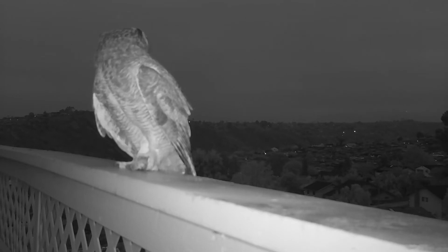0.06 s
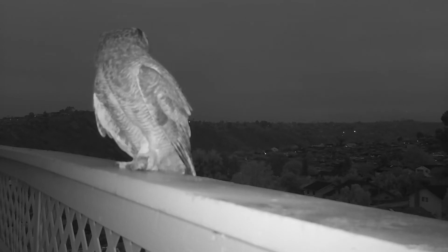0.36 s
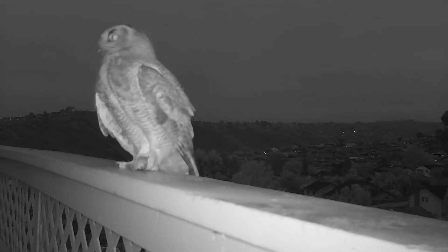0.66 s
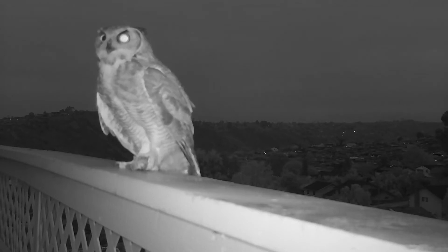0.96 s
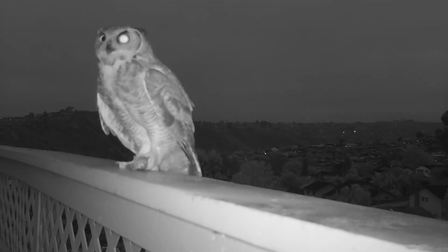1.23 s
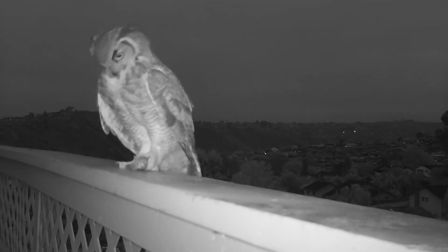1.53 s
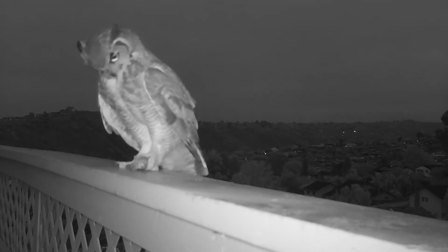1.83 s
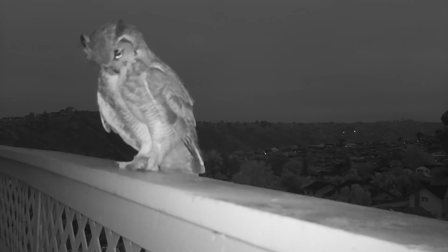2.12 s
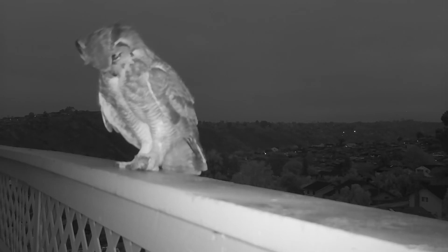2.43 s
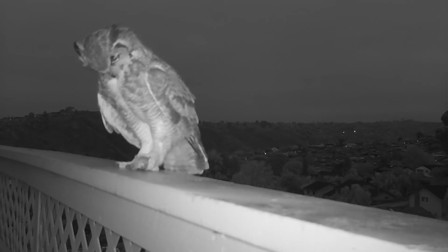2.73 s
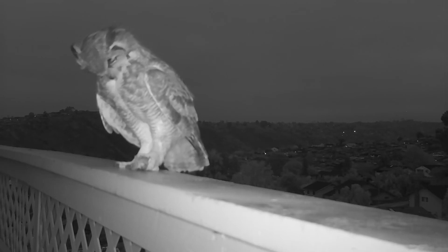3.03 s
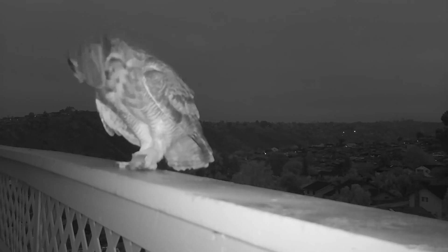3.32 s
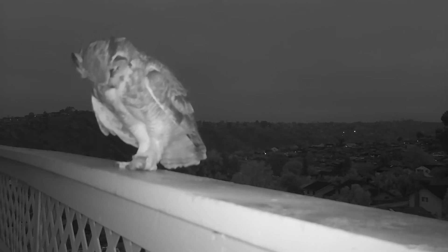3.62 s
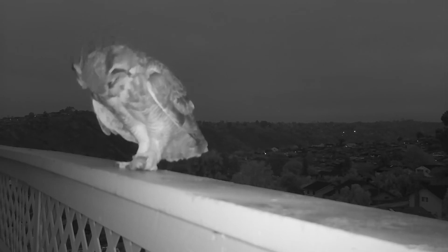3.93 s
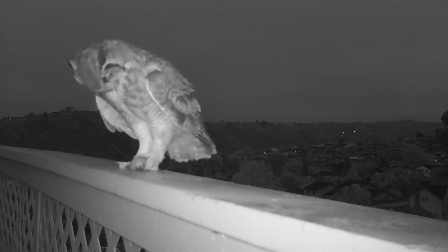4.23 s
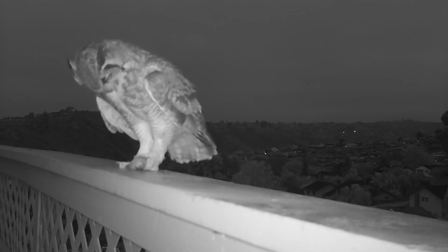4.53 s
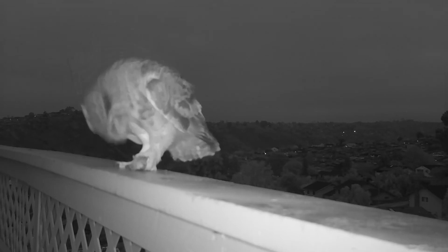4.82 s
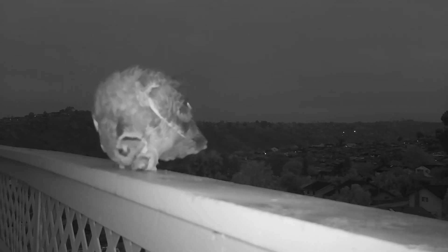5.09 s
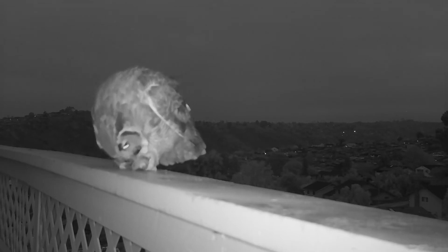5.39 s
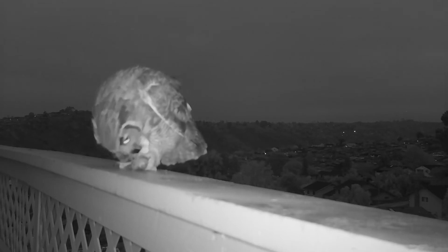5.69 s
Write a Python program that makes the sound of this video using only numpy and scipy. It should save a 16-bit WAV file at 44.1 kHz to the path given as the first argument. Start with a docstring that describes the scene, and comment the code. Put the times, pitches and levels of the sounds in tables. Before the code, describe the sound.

Outdoors at night, a quiet town rumble, faint hum, shrill far insects and microphone hiss carry on throughout, dotted with distant bird chirps and thin ticks. Close by and dry, a large owl picks at its prey: sparse soft clicks at first, then a hard crack of the beak and a busier run of snaps and short tearing pulls. A faint, distant motor tone enters near the end.

```python
"""An owl tears at its prey on a wooden deck rail at night, close to a small outdoor camera.
Each beak snap is one ringing contact; pulls and nibbles are runs of tiny slips of the same kind.
Far birds chirp, whistle and squeak (gliding sines), scold and trill (noise bursts); thin ticks fall.
The hillside echoes them. Under all: town rumble, faint hum, a far insect chorus and camera hiss.
A distant motor comes in near the end."""
import sys
import numpy as np
from scipy import signal
from scipy.fft import rfft, irfft, next_fast_len
from scipy.io import wavfile
from scipy.ndimage import map_coordinates

SR = 44100
rng = np.random.default_rng(int(sys.argv[2]) if len(sys.argv) > 2 else 0)


def dump_mix(stems):
    """Bounce the given channels to the path in sys.argv[1] as a 16-bit WAV at rate SR."""
    frames = np.atleast_2d(stems).T  # one column per channel
    limited = np.clip(frames, -1, 1)  # hard clip at full scale
    pcm = np.round(limited * 32767).astype(np.int16)
    wavfile.write(sys.argv[1], SR, pcm)


N = 262395
TIME_S = np.arange(N) / SR

# town rumble: (frequency [Hz], relative density [dB])
TOWN_SPECTRUM = [(10, -35), (27, -0.5), (90, 0.5), (200, -4.5), (400, -9.5), (650, -9), (900, -7),
                 (1150, -8.5), (1500, -15.5), (2200, -23), (5000, -70.5)]
# hum: (frequency [Hz], level [dB])
HUM_TONES = [(85, -68), (113, -66.5), (356, -70.5)]
# shrill insect band: (frequency [Hz], relative density [dB])
INSECT_SPECTRUM = [(3000, -52), (3800, -6.5), (4200, 3.5), (4480, -2.5), (4800, -34), (6000, -53.5)]
# chorus swell: (time [s], level before lift [dB])
INSECT_SWELL = [(0.0, -59), (0.61, -57), (0.86, -61.5), (1.67, -59.5), (2.17, -56), (2.48, -61.5),
                (3.48, -60.5), (5.15, -58), (5.42, -60), (5.95, -58.5)]
# camera hiss: (frequency [Hz], relative density [dB])
HISS_SPECTRUM = [(700, -12.5), (1700, -9), (2200, -3), (2650, -1), (3250, -10), (3750, -7), (4230, -6.5),
                 (4700, -8), (6000, -14), (7500, -16), (8800, -15), (11000, -19), (15700, -22.5)]
# ticks, about three a second with pauses: (time [s])
TICK_TIMES_S = [.056, .467, .870, 1.335, 1.635, 1.959, 2.307, 2.647, 2.979, 3.357, 3.656, 3.958, 4.442,
                4.797, 5.526]
# one bird, about every 2 s: (time [s], level [dB], final pitch [Hz])
CHIRP_NOTES = [(0.071, -40.5, 5088), (2.218, -48, 5088), (3.97, -44.5, 5132), (5.71, -46.5, 5013)]
# held whistles: (time [s], level [dB])
WHISTLE_NOTES = [(.28, -59), (3.14, -59)]
# one beak contact: (frequency [Hz], gain [dB])
CONTACT_SPECTRUM = [(200, -30), (900, -17.5), (1450, -12.5), (2150, -3), (2620, 8), (3050, -1.5),
                    (3600, -9), (4300, -15.5), (5300, -20), (6050, -39), (6900, -33.5), (8000, -52.5),
                    (9000, -47.5), (11000, -78.5), (14500, -109)]
# harder contact, broader spectrum: (frequency [Hz], gain per hardness [dB/dB])
HARDNESS_SLOPE = [(1100, 0.65), (2000, 0.1016), (2650, 0), (3500, 1), (5000, 1.1849), (7000, 1.83)]
# ring after a contact: (frequency [Hz], gain over contact [dB], t60 [s])
RING_MODES = [(1175, -5.5, 0.02), (1651, 1.5, 0.0435), (2087.5, 6, 0.0262), (2640, -5.5, 0.0313),
              (2924, -3.5, 0.0197), (3322, -1.5, 0.0122), (3713.3, 7, 0.014), (4278.6, 12, 0.0186),
              (4946, 2, 0.019)]
# quick bites: (time [s], rms [dB])
BEAK_NIBBLES = [(.452, -48.5), (1.765, -48.5), (2.308, -50.5), (2.328, -44), (4.018, -41), (4.061, -47.5),
                (4.145, -50), (4.173, -49.5), (4.203, -43.5), (4.946, -48.5), (4.971, -38.5)]
# squeaks: (time [s], length [s], first pitch [Hz], final pitch [Hz], level [dB], bend, upper voice [Hz])
SQUEAK_NOTES = [(.485, 0.02564, 4687, 4112, -44.5, 2.47, 6650), (5.091, .048, 5306, 2975, -40, .33, 6355)]
# scolding: (time [s], level [dB])
SCOLD_NOTES = [(.655, -50.5), (.857, -55.5), (0.997, -56), (1.107, -54), (1.24, -60), (5.127, -48.5)]
# hoarse colour: (frequency [Hz], relative density [dB])
SCOLD_SPECTRUM = [(2000, -11), (3600, 2.5), (5000, 0), (7000, -5.5), (9000, -10), (12500, -24.5),
                  (15000, -39.5)]
# sharp snaps: (time [s], peak before cap [dB], hardness [dB])
BEAK_SNAPS = [(1.212, -41.5, 2), (1.7975, -34.5, -8), (3.3823, 0, 14.5), (3.3841, -19, 0.5),
              (3.8738, -23, 1.5), (4.0971, -19, -6.5), (4.1031, -21.5, 3), (4.111, -23.5, -8.5),
              (4.7215, -24, -2.5), (4.9093, -14.5, -4), (5.0232, -27, -1), (5.0689, -31.5, -0.5),
              (5.857, -33.5, 6)]
# pulls: (time [s], length [s], rms [dB], hardness [dB], flesh gives at [share of length])
BEAK_PULLS = [(1.6, 0.106, -56, -7, 0.51), (3.236, 0.0308, -43.5, -5.5, 0.82),
              (3.271, 0.0178, -46, -2.5, .6), (3.413, 0.0244, -49, 4, 0.72), (4.087, .03, -33.5, -4, 0.138),
              (4.632, 0.0334, -44.5, 1.5, 0.39), (4.664, 0.0908, -42, 0.5, 0.48),
              (4.84, 0.0276, -46, -0.5, 0.52), (5.021, 0.057, -44, -0.5, 0.091),
              (5.702, .086, -50, -1, 0.35), (5.802, 0.018, -49.5, -5.5, 0.34),
              (5.856, 0.0178, -47.5, 3, 0.19)]


def amp(db):
    return 10 ** (np.asarray(db) / 20)


def unit_rms(x):
    return x / np.sqrt(np.mean(x ** 2) + 1e-20)


def along(points, hz):
    """Interpolate (frequency [Hz], value) points on a log axis."""
    knots_hz, values = np.transpose(points)
    return np.interp(np.log(hz + 1), np.log(knots_hz + 1), values)


def wobble(rate_hz):
    """Smooth random curve, rate_hz knots a second."""
    return map_coordinates(rng.standard_normal(int(N * rate_hz / SR) + 4), [TIME_S * rate_hz])


def filtered(x, response):
    """Apply a gain that depends on frequency."""
    size = next_fast_len(len(x) + 8192)
    return irfft(rfft(x, size) * response(np.fft.rfftfreq(size, 1 / SR)), size)[:len(x)]


def noise(spectrum):
    """Coloured noise, rms 1."""
    return unit_rms(filtered(rng.standard_normal(N), lambda hz: amp(along(spectrum, hz))))


def tone(hz, wander_rad):
    """Sine with wandering phase, rms 1."""
    return np.sqrt(2) * np.sin(2 * np.pi * hz * TIME_S + wander_rad * wobble(4.968))


def town(level_db=-49.5, lull_db=-1.97, lull_span_s=(4.43, 5.38), flutter_db=0.9929):
    """The town below: a rumble that eases near the end, and a faint hum."""
    easing_db = np.interp(TIME_S, lull_span_s, [0, lull_db])
    rumble = amp(level_db + easing_db + flutter_db * wobble(7.052)) * noise(TOWN_SPECTRUM)
    hum = sum(amp(db) * tone(hz, wander_rad=0.835) for hz, db in HUM_TONES)
    return rumble + hum


def insects(lift_db=1.0, pulse_db=1.5):
    """Far, shrill chorus: a noise band that swells slowly and pulses."""
    swell_db = np.interp(TIME_S, *np.transpose(INSECT_SWELL))
    return amp(swell_db + lift_db + pulse_db * wobble(14)) * noise(INSECT_SPECTRUM)


def camera_hiss(level_db=-55.0):
    """The camera's own steady noise."""
    return amp(level_db) * noise(HISS_SPECTRUM)


def ticks(level_db=-54.0, first_hz=9600, final_hz=3400, length_s=0.011, echo_s=0.0046, echo_db=-6):
    """Fast downward sweeps, all alike, each doubled by a nearby surface."""
    out = np.zeros(N)
    progress = np.linspace(0, 1, round(length_s * SR))
    hz = first_hz * (final_hz / first_hz) ** progress
    sweep = np.sqrt(2) * np.sin(np.pi * progress) * np.sin(2 * np.pi * np.cumsum(hz) / SR)
    for time_s in TICK_TIMES_S:
        add(out, time_s, amp(level_db) * sweep)
        add(out, time_s + echo_s, amp(level_db + echo_db) * sweep)
    return out


def add(track, time_s, sound):
    """Mix a sound into a track."""
    part = track[max(round(time_s * SR), 0):][:len(sound)]
    part += sound[:len(part)]


def note(length_s, first_hz, final_hz, bend, warble_depth_hz, waver=0.0088, warble_hz=135, late=1):
    """Whistled note: swells, warbles, falls. bend > 1 drops early; late > 1 delays the swell."""
    progress = np.linspace(0, 1, round(length_s * SR))
    glide_hz = final_hz + (first_hz - final_hz) * (1 - progress) ** bend
    hz = glide_hz * (1 + waver * wobble(386.6)[:len(progress)])
    hz += warble_depth_hz * np.sin(2 * np.pi * warble_hz * length_s * progress)
    swell = np.sin(np.pi * progress ** late)
    return np.sqrt(2) * swell * np.sin(2 * np.pi * np.cumsum(hz) / SR)


def chirps(length_s=0.0365, fall_ratio=1.145):
    """A far bird repeats one short falling note."""
    out = np.zeros(N)
    for time_s, db, final_hz in CHIRP_NOTES:
        chirp = note(length_s, fall_ratio * final_hz, final_hz, bend=3.57, warble_depth_hz=60)
        add(out, time_s, amp(db) * chirp)
    return out


def whistles(length_s=0.169, first_hz=3820, final_hz=3750, high_tone_ratio=2.07, high_tone_db=-15):
    """A held, wavering whistle; a faint, thin tone near 8 kHz sounds with it."""
    out = np.zeros(N)
    for time_s, db in WHISTLE_NOTES:
        for ratio, tone_db in [(1, 0), (high_tone_ratio, high_tone_db)]:
            held = note(length_s, ratio * first_hz, ratio * final_hz,
                        bend=0.99, warble_depth_hz=70, waver=0.0143)
            add(out, time_s, amp(db + tone_db) * held)
    return out


def contact(hardness_db, size=2048):
    """One contact: a short pulse and its brief ring. Harder is brighter."""
    hz, time_s = np.fft.rfftfreq(size, 1 / SR), TIME_S[:size]
    gain_db = along(CONTACT_SPECTRUM, hz) + hardness_db * along(HARDNESS_SLOPE, hz)
    cepstrum = irfft(np.log(amp(gain_db)))
    cepstrum[1:size // 2] *= 2  # fold to minimum phase: a causal pulse
    cepstrum[size // 2 + 1:] = 0
    ring = np.zeros(size)
    for mode_hz, db, t60_s in RING_MODES:
        fade = 1000 ** (-time_s / t60_s)
        ring += 2 * amp(db) * fade / fade.sum() * np.cos(2 * np.pi * mode_hz * time_s)
    return irfft(np.exp(rfft(cepstrum)) * (1 + rfft(ring)))


def tear(length_s, hardness_db, gives_at, slips_per_s=2800, spread_db=4.5, swell_db=8):
    """Tiny slips, each a contact, grow until the flesh gives, then ease; rms 1 over length_s."""
    count = round(length_s * SR)
    tension = np.interp(np.linspace(0, 1, count), [0, gives_at, 1], [0, 1, 0])
    slips = (rng.random(count) < slips_per_s / SR) * rng.choice([-1, 1], count)
    strength = amp(spread_db * rng.standard_normal(count) + swell_db * tension)
    sound = signal.fftconvolve(slips * strength, contact(hardness_db))
    return sound * np.sqrt(count / (np.sum(sound ** 2) + 1e-12))


def nibbles(length_s=0.0077, hardness_db=-3.5):
    """Quick bites, each a very short tear."""
    out = np.zeros(N)
    for time_s, db in BEAK_NIBBLES:
        add(out, time_s, amp(db) * tear(length_s, hardness_db, gives_at=0.444))
    return out


def squeaks(octave_db=-25, upper_db=-11, upper_sag_ratio=0.91):
    """Harsh two-voiced bird notes: a falling voice with its octave, and a sagging upper voice."""
    out = np.zeros(N)
    for time_s, length_s, first_hz, final_hz, db, bend, upper_hz in SQUEAK_NOTES:
        partials = [(first_hz, final_hz, 0), (2 * first_hz, 2 * final_hz, octave_db),
                    (upper_hz, upper_sag_ratio * upper_hz, upper_db)]
        for from_hz, to_hz, partial_db in partials:
            partial = note(length_s, from_hz, to_hz, bend, warble_depth_hz=221, waver=0.0271, late=1.34)
            add(out, time_s, amp(db + partial_db) * partial)
    return out


def rasp(length_s, colour):
    """One hoarse note: a short swell of coloured noise."""
    swell = np.sin(np.linspace(0, np.pi, round(length_s * SR)))
    return swell * unit_rms(filtered(rng.standard_normal(len(swell)), colour))


def scolds(length_s=0.0242):
    """A small bird's broad, hoarse notes."""
    out = np.zeros(N)
    for time_s, db in SCOLD_NOTES:
        add(out, time_s, amp(db) * rasp(length_s, lambda hz: amp(along(SCOLD_SPECTRUM, hz))))
    return out


def snaps(peak_cap=0.98):
    """Single sharp contacts of beak and talons; the hardest one bounces."""
    out = np.zeros(N)
    for time_s, db, hardness_db in BEAK_SNAPS:
        hit = contact(hardness_db)
        add(out, time_s, min(amp(db), peak_cap) * hit / np.abs(hit).max())
    return out


def pulls():
    """The beak pulls at the prey: longer tears."""
    out = np.zeros(N)
    for time_s, length_s, db, hardness_db, gives_at in BEAK_PULLS:
        add(out, time_s, amp(db) * tear(length_s, hardness_db, gives_at))
    return out


def trill(start_s=4.197, gap_s=0.078, slowing_s=0.002, notes=7, note_s=0.0271,
          top_hz=9000, climb_hz=1650, width_hz=700, top_db=-51, swell_db=9, settle_notes=1.61):
    """High, slowing trill. Effort builds over the first notes and lifts pitch and level."""
    out = np.zeros(N)
    for k in range(notes):
        time_s = start_s + k * gap_s + slowing_s * k * (k - 1) / 2
        reserve = np.exp(-k / settle_notes)
        centre_hz = top_hz - climb_hz * reserve
        burst = rasp(note_s, lambda hz: np.exp(-0.5 * ((hz - centre_hz) / width_hz) ** 2))
        add(out, time_s, amp(top_db - swell_db * reserve) * burst)
    return out


def motor(start_s=5.2, rise_s=0.083, hz=242.9, level_db=-57.5, fade_db_per_s=6.5):
    """A distant motor's tone comes in, then fades a little."""
    running_s = np.maximum(TIME_S - start_s, 0)
    onset = np.minimum(running_s / rise_s, 1)
    return onset * amp(level_db - fade_db_per_s * running_s) * tone(hz, wander_rad=0.18)


def hillside(x, t60_s, wet_db):
    """Trees and slopes scatter a diffuse tail after a sound."""
    tail = rng.standard_normal(SR) * 1000 ** (-TIME_S[:SR] / t60_s)
    return x + amp(wet_db) * signal.fftconvolve(x, tail / np.linalg.norm(tail))[:N]


def scene():
    """Near owl almost dry, far birds with the hillside's tail, background under all."""
    background = town() + insects() + camera_hiss() + motor()
    birds = hillside(ticks(), t60_s=0.186, wet_db=-5.5)
    birds += hillside(chirps() + whistles() + squeaks(), t60_s=0.492, wet_db=-1.5)
    birds += hillside(scolds() + trill(), t60_s=0.55, wet_db=1.0)
    owl = hillside(nibbles() + snaps() + pulls(), t60_s=0.186, wet_db=-34.5)
    return (owl + birds + background)[None]


def record(dry, band_limit_hz=15800):
    """The camera keeps nothing above its band limit."""
    return filtered(dry[0], lambda hz: hz < band_limit_hz)[None]


dry = scene()
out = record(dry)
dump_mix(out)
```